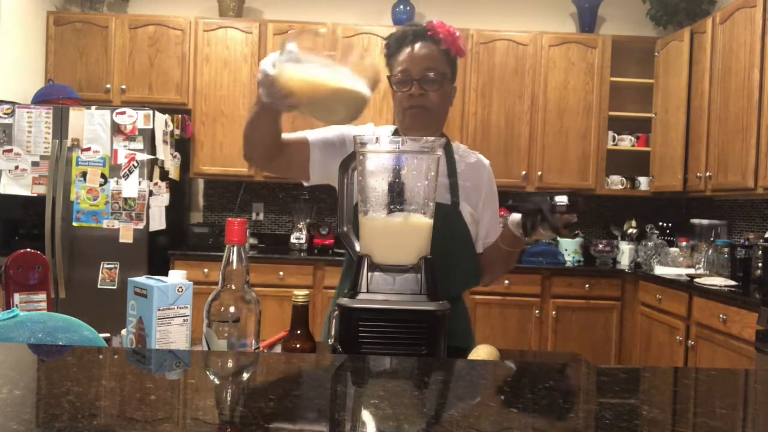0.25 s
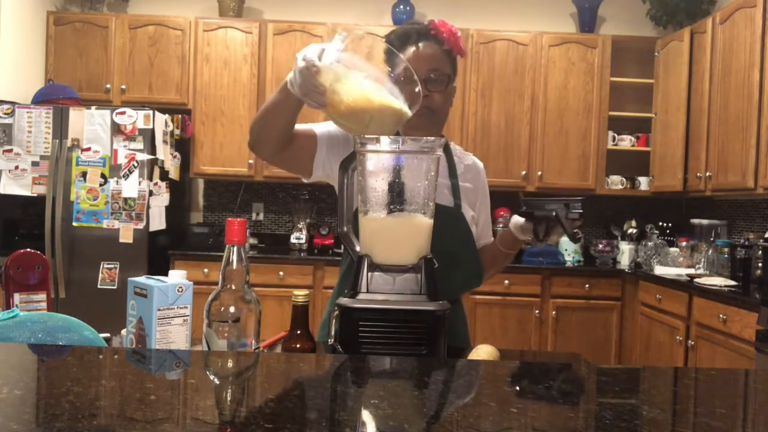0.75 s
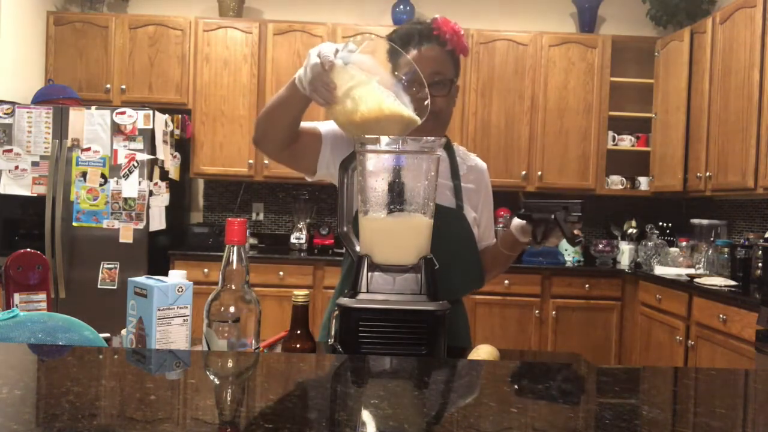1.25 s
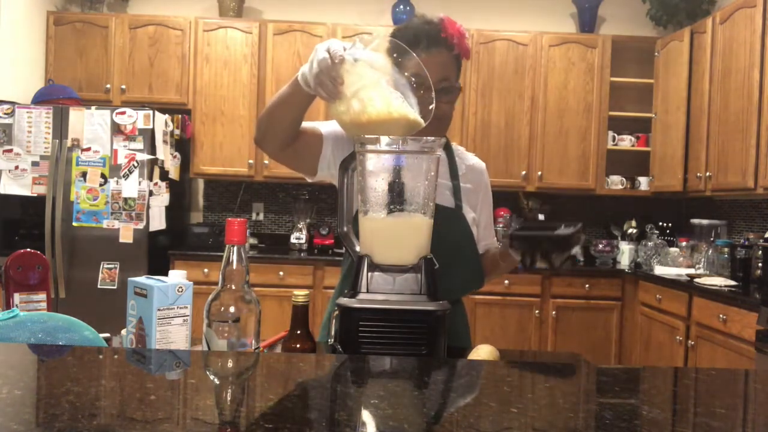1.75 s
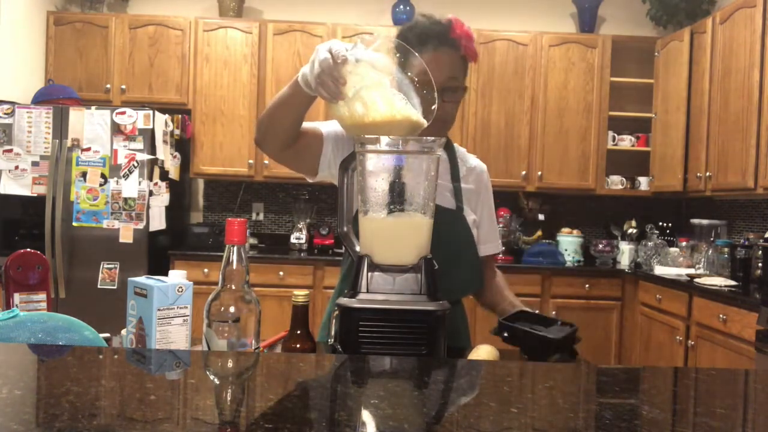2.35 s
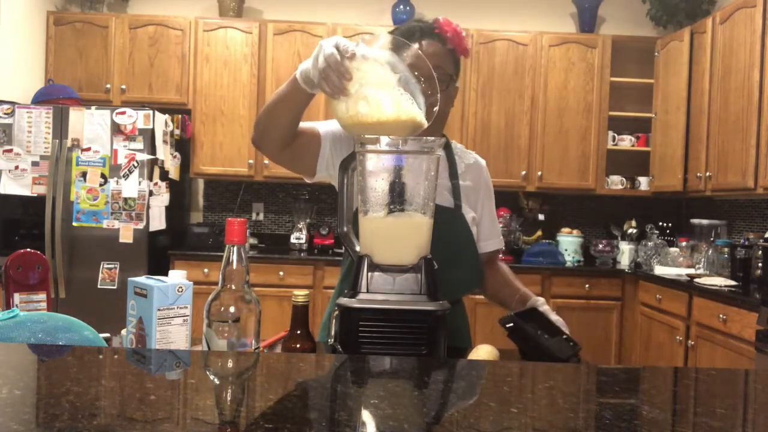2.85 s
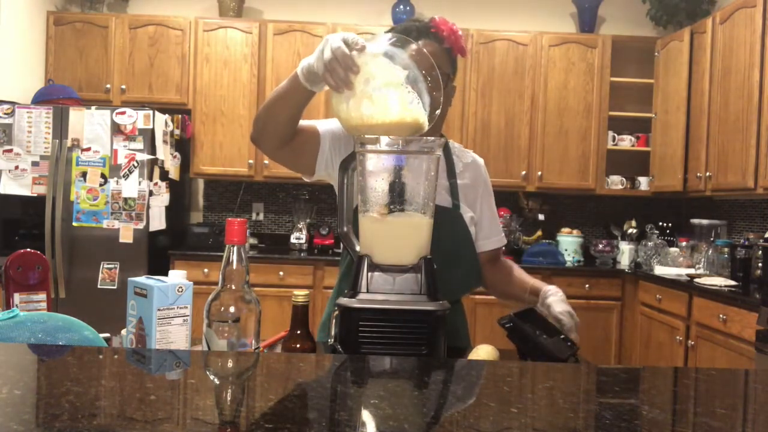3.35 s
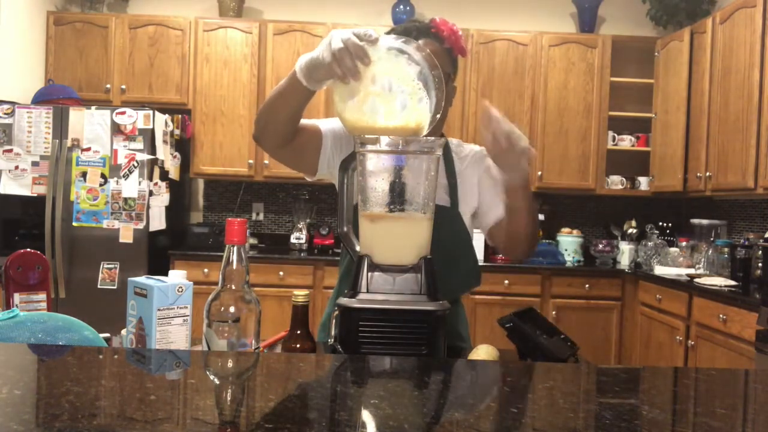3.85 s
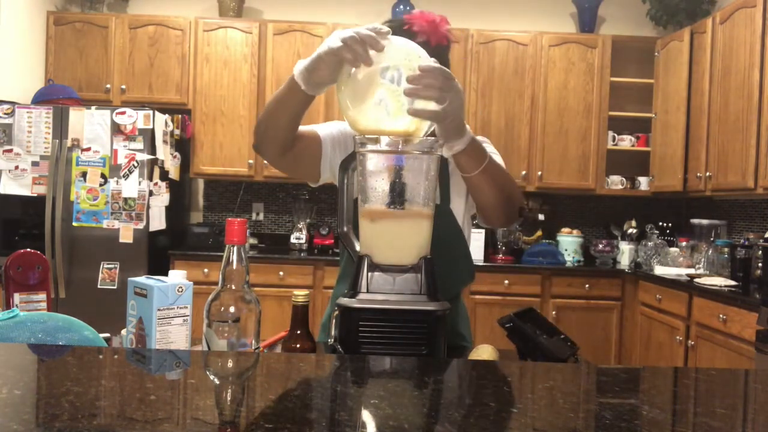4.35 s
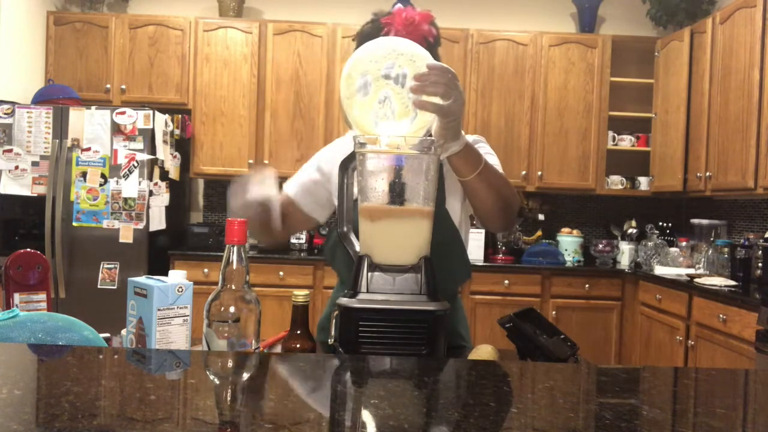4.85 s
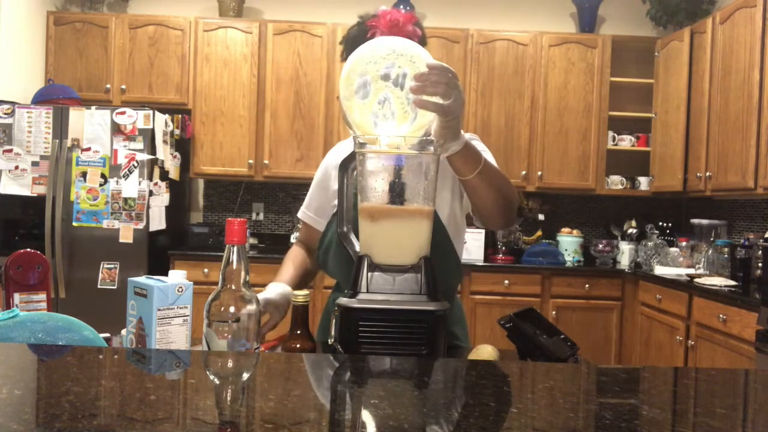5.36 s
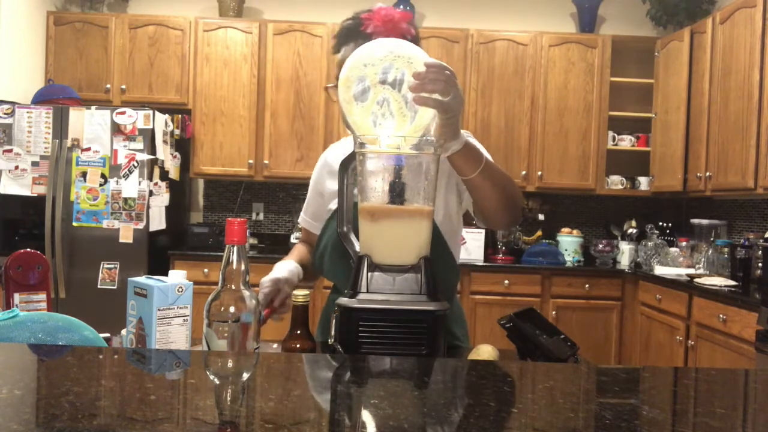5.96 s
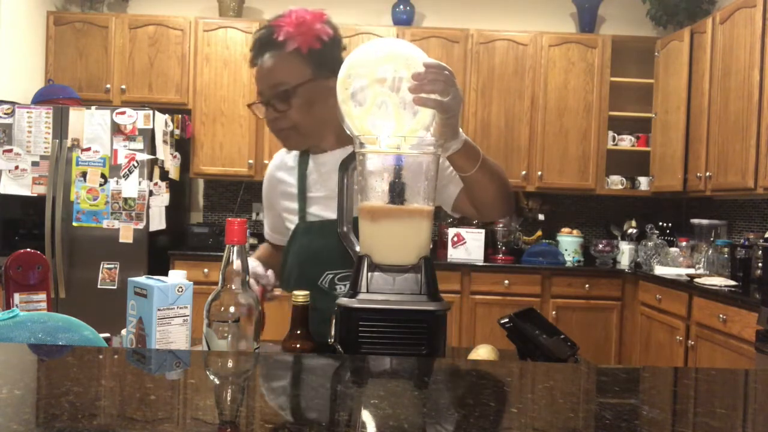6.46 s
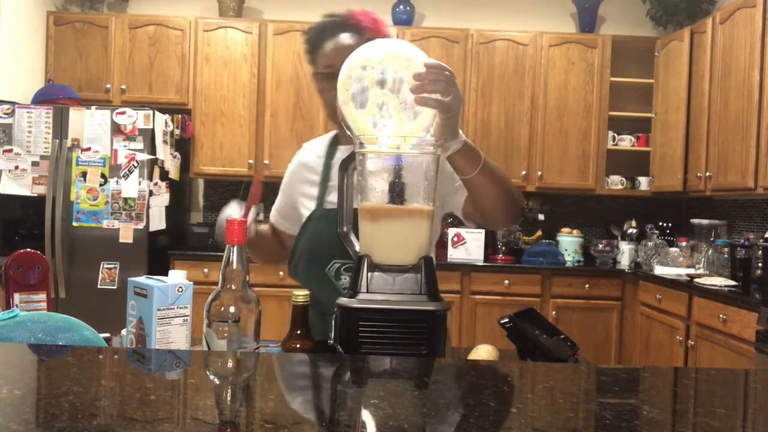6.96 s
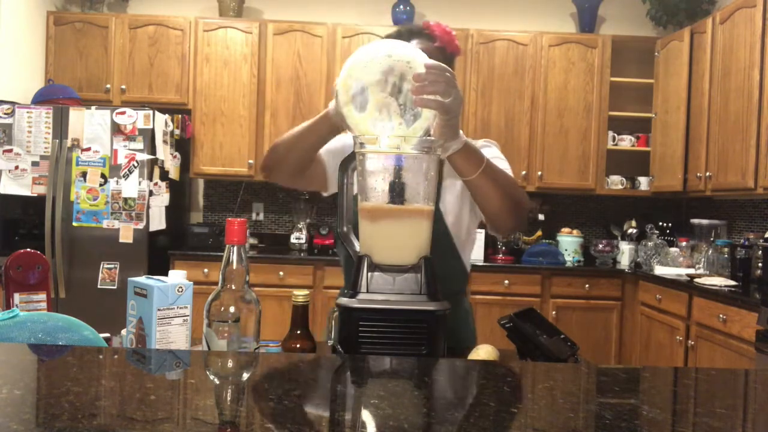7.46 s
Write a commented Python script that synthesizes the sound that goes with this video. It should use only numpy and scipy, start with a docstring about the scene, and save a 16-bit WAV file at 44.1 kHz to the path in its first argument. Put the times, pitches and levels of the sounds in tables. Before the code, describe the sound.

Thick batter drops from a glass bowl into a blender jar with a plop, then a heavier splat and smaller drips. A plastic lid clatters briefly onto a stone counter, and a spatula is picked up with light knocks. The bowl then strikes the jar with a loud, ringing clink, followed by soft taps and plops. A faint fridge hum runs underneath, and the kitchen adds a short reverberation.

```python
"""Over a faint fridge hum and the rustle of gloves and clothes, a glass bowl squeaks as it is tipped.
Thick batter slides into a blender jar: air pockets resonate as plops, and one heavy lump splats.
A plastic lid is put down, and a spatula is taken off the stone counter. The bowl nudges the jar,
then strikes it hard and rings in its modes. Last, the spatula taps the bowl amid the final plops.
The kitchen reverberates briefly after each sound."""
import sys
import numpy as np
from scipy import signal
from scipy.fft import rfft, irfft, next_fast_len
from scipy.io import wavfile

SR = 44100
rng = np.random.default_rng(int(sys.argv[2]) if len(sys.argv) > 2 else 0)


def dump_mix(stems):
    """Bounce the given channels to the path in sys.argv[1] as a 16-bit WAV at rate SR."""
    frames = np.atleast_2d(stems).T  # one column per channel
    limited = np.clip(frames, -1, 1)  # hard clip at full scale
    pcm = np.round(limited * 32767).astype(np.int16)
    wavfile.write(sys.argv[1], SR, pcm)


N = 340011

# The fridge's hum. Each row: frequency in Hz, level in dB.
HUM_LINES = [(231, -70.5), (307, -78.5), (419, -78.5), (2245, -95.5), (3140, -92)]
# Arm movements. Each row: midpoint in seconds, length in seconds, level in dB, bright share from 0 to 1.
ARM_MOVES = [(1.135, 0.18, -88.5, .95), (2.452, 1.2, -81.5, .2), (4.05, 1.6, -79.5, .15),
             (5.14, 0.39, -81.5, .6), (5.85, 0.71, -82, .2), (6.26, 0.3, -76.5, .6), (7.65, 0.92, -82, .2)]
# Slips of the bowl's rim. Each row: start in seconds, initial pitch in Hz, level in dB.
RIM_SLIPS = [(0.379, 4450, -81), (.70, 4330, -86)]
# Batter landing. Each row: start in seconds, level in dB, nominal pitch of the air pocket in Hz,
# wet smack in dB relative to the level.
PLOPS = [(.8176, -34.5, 535, -14), (1.731, -59.5, 526, -9), (2.1445, -36.5, 570, -25),
         (2.278, -44, 960, -13), (2.594, -56.5, 597, -22), (3.027, -62.5, 482, -11),
         (3.332, -55, 470, -15.5), (3.4341, -52.5, 490, -15.5), (3.621, -61.5, 484, -19),
         (4.604, -56, 545, -22), (7.468, -59.5, 598, -13), (7.480, -53.5, 440, -29),
         (7.556, -49.5, 567, -16.5)]
# The bowl touching the jar. Each row: start in seconds, level in dB, ring in dB relative to the level,
# frequency in Hz above which the modes are only weakly excited.
CLINKS = [(5.022, -68.5, -5, 9000), (5.04, -79, 2, 9000), (5.14, -72, -3, 4500), (5.224, -75.5, 5.5, 3800),
          (5.406, -69, 9.5, 5950), (6.522, -69.5, 10.5, 2360), (6.573, -66.5, 26, 2080),
          (6.634, -54.5, 4, 3175), (6.6461, -21.7, -2, 18000), (6.6478, -27, -12.5, 18540),
          (6.6507, -27.5, -22, 18100)]
# The bowl's modes. Each row: frequency in Hz, relative level in dB, time to fall 60 dB in seconds.
BOWL_MODES = [(1921, -4, .9), (2030, -12, .65), (2422, -20, .6), (3055, 0, .66), (3105, -3.5, .62),
              (3190, -7, .6), (3245, -9, .62), (3354, -13, .6), (3440, -15, .65), (3620, -14, .65),
              (3760, -13, .62), (4254, -6.5, .68), (4338, -6, .72), (5058, -8, .6), (5216, -9, .62),
              (5770, -13, .66), (5812, -19, .6), (7190, -18, .55), (7345, -19, .52), (9878, -25, .45),
              (14300, -20, .3)]

# Brief contacts. Each row: start in seconds, level in dB.
GLOVE_TICKS = [(1.745, -75), (2.034, -65.5), (4.543, -80), (5.11, -74), (5.163, -74), (5.82, -73.5),
               (5.95, -72.5), (6.495, -69.5), (6.586, -57)]
LUMP_BURSTS = [(2.1455, -36.5), (2.1476, -31.5), (2.280, -49), (3.329, -61.5), (3.4355, -67)]
LID_KNOCKS = [(2.6602, -50.5), (2.6632, -42.5), (2.6675, -39), (2.686, -55), (2.7245, -44.5),
              (2.734, -51.5)]
UTENSIL_KNOCKS = [(4.446, -66), (5.021, -76), (5.4065, -48), (5.424, -55), (5.608, -64.5), (5.632, -70),
                  (6.435, -71)]
JAR_NUDGES = [(5.019, -59), (5.041, -60.5), (5.095, -67.5), (5.41, -60.5), (5.462, -58.5), (5.61, -64)]
SPATULA_TAPS = [(7.4735, -59.5), (7.519, -67.5)]

# Spectra of noises and struck bodies. Each row: frequency in Hz, relative spectral density in dB.
AIR_SPECTRUM = [(10, -58.5), (25, -38.5), (40, -24), (60, -6.5), (100, -9), (160, -4), (210, -2), (280, -9),
                (450, -9.5), (700, -13), (1000, -20), (2000, -30), (4000, -34.5), (7500, -35),
                (9500, -41.5), (14000, -44), (15500, -52)]
CLOTH_SPECTRUM = [(300, -2.5), (1400, 5), (3500, -0.5), (5500, -4.5), (8000, -14), (11000, -20),
                  (15000, -21.5)]
SMACK_SPECTRUM = [(200, -16), (450, -2), (750, -8), (1300, 0), (2600, -7), (3050, 5.5), (3450, -6),
                  (4400, -9.5), (5200, -16), (8000, -21.5), (15000, -27)]
GLOVE_SPECTRUM = [(500, -10), (1800, 1.5), (3000, -8.5), (4000, 3.5), (6000, -10), (8000, -5),
                  (10500, -17.5), (15000, -15.5)]
SPLASH_SPECTRUM = [(200, -57), (400, -6.5), (620, 3.5), (1050, -1), (1800, -7.5), (2700, -16), (3500, -17),
                   (4700, -15.5), (5600, -22), (8000, -27.5), (15000, -36.5)]
LID_SPECTRUM = [(120, -19), (300, -6), (600, 5.5), (1050, 2.5), (1700, -8.5), (2600, -8.5), (4500, -6.5),
                (6500, -13), (9000, -21), (15000, -27.5)]
HANDLE_SPECTRUM = [(300, -29.5), (800, -15), (1200, 2.5), (1500, 4), (2300, -3.5), (3100, 1), (4500, -14),
                   (5800, -19.5), (6500, -34), (10400, -27.5), (11150, -14.5), (12300, -25), (14000, -29.5)]
JAR_SPECTRUM = [(200, -39), (550, -11), (660, -7), (725, 6.5), (800, -8.5), (1000, -19), (2000, -15),
                (6000, -49), (15000, -53)]
GLASS_SPECTRUM = [(120, -54.5), (250, -22), (750, -19.5), (1250, -13), (1650, -17.5), (1960, -2),
                  (2250, -15.5), (2830, -12.5), (3120, 6), (3450, -6.5), (4250, -3), (4700, -9.5),
                  (5100, -6.5), (6150, -21), (7350, -14), (9000, -25.5), (12800, -28), (14300, -17.5),
                  (15800, -17.5)]
BLADE_SPECTRUM = [(400, -9), (1200, -3), (1550, 7), (2100, -8), (2650, 11), (3200, -38), (3950, 4.5),
                  (4500, -29), (8000, -23), (15000, -32)]

# The kitchen's reverberation. Each row: frequency in Hz, time to fall 60 dB in seconds.
ROOM_DECAY = [(200, 0.63), (550, 0.7), (1100, 0.83), (2500, 0.72), (4500, 0.73), (8000, 0.69),
              (14000, 0.39)]
# Reflections from cupboards and ceiling. Each row: delay in seconds, gain in dB.
ROOM_ECHOES = [(0.0142, -20.5), (.0255, -9.5), (.034, -15), (.045, -17.5)]


def amp(db):
    """Amplitude grows tenfold for every 20 dB."""
    return 10 ** (np.asarray(db) / 20)


def unit(x):
    """Normalisation to an rms of 1."""
    return x / np.sqrt(np.mean(x ** 2) + 1e-20)


def unit_energy(x):
    """Normalisation of a transient to the energy of 10 ms at an rms of 1."""
    return x / np.sqrt(np.sum(x ** 2) / (.01 * SR) + 1e-20)


def curve_at(points, hz):
    """Interpolation of a table on a logarithmic frequency axis."""
    table_hz, value = np.transpose(points)
    return np.interp(np.log(hz + 1), np.log(table_hz + 1), value)


def add(mix, start_s, sound):
    """Superposition: a sound adds linearly to the mix."""
    part = mix[round(start_s * SR):][:len(sound)]
    part += sound[:len(part)]


def noise(spectrum):
    """White noise takes on the spectrum of its filter."""
    size = next_fast_len(N, True)
    gain = amp(curve_at(spectrum, np.fft.rfftfreq(size, 1 / SR)))
    return unit(irfft(rfft(rng.standard_normal(size)) * gain, size)[:N])


def drift(hz):
    """Random modulation at rates up to about the given frequency."""
    position = np.arange(N) / SR * hz * 2
    return unit(np.interp(position, np.arange(4096), rng.standard_normal(4096)))


def contact(spectrum, scuff_s, size=4096):
    """Source and filter: a decaying scuff sets the texture, the body alone sets the spectrum."""
    force = np.fft.fft(rng.standard_normal(size) * np.exp(-np.arange(size) / SR / scuff_s))
    target = amp(curve_at(spectrum, abs(np.fft.fftfreq(size, 1 / SR))))
    log_gain = np.log(target / (abs(force) + 1e-9))
    body = np.exp(np.conj(signal.hilbert(log_gain)))  # minimum phase: rings only after the touch
    return unit_energy(np.fft.ifft(force * body).real[:size // 2])


def knocks(rows, spectrum, scuff_s):
    """Repeated contacts on one body share its spectrum but differ in texture."""
    out = np.zeros(N)
    for start_s, db, *_ in rows:
        add(out, start_s, amp(db) * contact(spectrum, scuff_s))
    return out


def fridge(waver_hz=1.2, flutter_db=-1.0, air_db=-68):
    """A line spectrum, slightly modulated in pitch and level, stands over broadband air noise."""
    hum = np.zeros(N)
    for hz, db in HUM_LINES:
        gain = amp(db + flutter_db * drift(6.2))
        cycles = np.cumsum(hz + waver_hz * drift(4.88)) / SR
        hum += gain * unit(np.sin(2 * np.pi * cycles))
    return hum + amp(air_db) * noise(AIR_SPECTRUM)


def rustle(still_db=-86, grain_db=3):
    """Friction of gloves and cloth makes grainy noise that swells with each move; quick ones are brighter."""
    t = np.arange(N) / SR
    cloth = noise(CLOTH_SPECTRUM)
    swish = unit(np.gradient(noise(CLOTH_SPECTRUM)))  # differentiation lifts the treble
    dull_power, bright_power = amp(still_db) ** 2, 0
    for middle_s, length_s, db, bright_share in ARM_MOVES:
        power = (amp(db) * np.cos(np.pi * np.clip((t - middle_s) / length_s, -.5, .5))) ** 2
        dull_power += (1 - bright_share) * power
        bright_power += bright_share * power
    grain = unit(amp(grain_db * drift(70)))
    return (np.sqrt(dull_power) * cloth + np.sqrt(bright_power) * swish) * grain


def rim_squeaks(rise_s=.06, sag=.02, wobble=.01):
    """Friction at the slipping rim excites a thin wavering tone that swells, sinks and dies away."""
    out, age = np.zeros(N), np.arange(N) / SR / rise_s
    for start_s, hz, db in RIM_SLIPS:
        pitch_hz = hz * (1 - sag * age / (1 + age) + wobble * drift(120))
        tone = unit(np.sin(2 * np.pi * np.cumsum(pitch_hz) / SR))
        add(out, start_s, amp(db) * age * np.exp(1 - age) * tone)
    return out


def plops(lag_s=0.002735, swell_s=0.0028, t60_s=0.02, sag=0.2, sag_s=0.0039):
    """Cavity resonance: a blob smacks down and opens an air pocket whose note sags as it deepens."""
    out, t = np.zeros(N), np.arange(SR // 8) / SR
    envelope = (1 - np.exp(-t / swell_s)) * amp(-60 * t / t60_s)
    for start_s, db, hz, smack_db in PLOPS + trailing_lumps():
        cycles = np.cumsum(hz * (0.953 + sag * np.exp(-t / sag_s))) / SR
        pocket = unit_energy(np.sin(2 * np.pi * cycles) * envelope)
        add(out, start_s, amp(db + smack_db) * contact(SMACK_SPECTRUM, scuff_s=0.003))
        add(out, start_s + lag_s, amp(db) * pocket)
    return out


def glove_ticks():
    """Adhesion between glove and rim gives small sticky ticks."""
    return knocks(GLOVE_TICKS, GLOVE_SPECTRUM, scuff_s=0.0071)


def splats(trail_offset_db=-2):
    """Lumps bursting on the surface radiate broadband transients."""
    trail = [(start_s, db + trail_offset_db) for start_s, db, *_ in trailing_lumps()]
    return knocks(LUMP_BURSTS + trail, SPLASH_SPECTRUM, scuff_s=0.00327)


def trailing_lumps(start_s=2.184, gap_s=0.039, db=-43, step_db=-4.5, hz=720, step_hz=70, smack_db=-16):
    """Smaller lumps sound weaker and higher; five follow the heavy one, as rows like those of PLOPS."""
    return [(start_s + k * gap_s, db + k * step_db, hz + k * step_hz, smack_db) for k in range(5)]


def lid():
    """Impacts excite the plastic lid as it settles on the counter."""
    return knocks(LID_KNOCKS, LID_SPECTRUM, scuff_s=0.0054)


def utensils():
    """Light impacts of utensils and hands excite the resonances of a wooden handle."""
    return knocks(UTENSIL_KNOCKS, HANDLE_SPECTRUM, scuff_s=0.0059)


def jar_nudges():
    """The bowl's weight excites the jar's body resonance."""
    return knocks(JAR_NUDGES, JAR_SPECTRUM, scuff_s=0.0042)


def glass_clinks():
    """Each impact of bowl on jar begins with a bright, broadband transient."""
    return knocks(CLINKS, GLASS_SPECTRUM, scuff_s=0.0057)


def bowl_ring(split_hz=12, twin_db=-6):
    """Free vibration: each of the bowl's decaying modes beats against a close twin."""
    out, t = np.zeros(N), np.arange(SR) / SR
    hz, mode_db, t60_s = np.transpose(BOWL_MODES)[:, :, None]
    envelopes = amp(mode_db) / np.linalg.norm(amp(mode_db)) * amp(-60 * t / t60_s)
    twin_hz = hz + split_hz * rng.uniform(0.73, 1.6, hz.shape)
    modes = envelopes * (np.exp(2j * np.pi * hz * t) + amp(twin_db) * np.exp(2j * np.pi * twin_hz * t))
    for start_s, db, ring_db, cutoff_hz in CLINKS:
        excitation = 1 / (1 + (hz[:, 0] / cutoff_hz) ** 4)  # a soft touch wakes only the low modes
        phasors = np.exp(2j * np.pi * rng.random(len(hz)))
        add(out, start_s, amp(db + ring_db) * ((excitation * phasors) @ modes).real)
    return out


def spatula_taps():
    """Taps into the bowl excite the resonances of the spatula's blade."""
    return knocks(SPATULA_TAPS, BLADE_SPECTRUM, scuff_s=0.0046)


def kitchen_response(tail_db=-3.5, build_s=0.0036):
    """A room's impulse response: a few early reflections and a diffuse tail whose treble dies first."""
    hz, t, spectra = signal.stft(rng.standard_normal(SR), SR, nperseg=256)
    decay = amp(-60 * t / curve_at(ROOM_DECAY, hz)[:, None])
    tail = signal.istft(spectra * decay, SR, nperseg=256)[1][:SR]
    tail *= 1 - np.exp(-(np.arange(SR) / SR / build_s) ** 2)
    tail *= amp(tail_db) / np.linalg.norm(tail)
    for delay_s, db in ROOM_ECHOES:
        add(tail, delay_s, amp([db]))
    return tail


def scene(jar_wet_db=-4, splat_wet_db=-1, glass_wet_db=2.0, ring_wet_db=-10, counter_wet_db=2):
    """Direct sound and its reverberation superpose on the steady hum."""
    clinks = glass_clinks()
    counter = lid() + utensils()
    hands = rustle() + rim_squeaks() + glove_ticks()
    jar = plops() + spatula_taps() + jar_nudges()
    sources = [(jar, jar_wet_db), (splats(), splat_wet_db), (clinks, glass_wet_db),
               (bowl_ring(), ring_wet_db), (counter + hands, counter_wet_db)]
    direct = sum(sound for sound, _ in sources)
    into_room = sum(amp(wet_db) * sound for sound, wet_db in sources)
    reverberation = signal.fftconvolve(into_room, kitchen_response())[:N]
    return (direct + reverberation + fridge())[None]


def record(dry, cutoff_hz=15700):
    """A low-pass filter removes the highest treble."""
    lowpass = signal.firwin(511, cutoff_hz, window=("kaiser", 9), fs=SR)
    return signal.oaconvolve(dry, lowpass[None], "same")


dry = scene()
out = record(dry)
dump_mix(out)
```